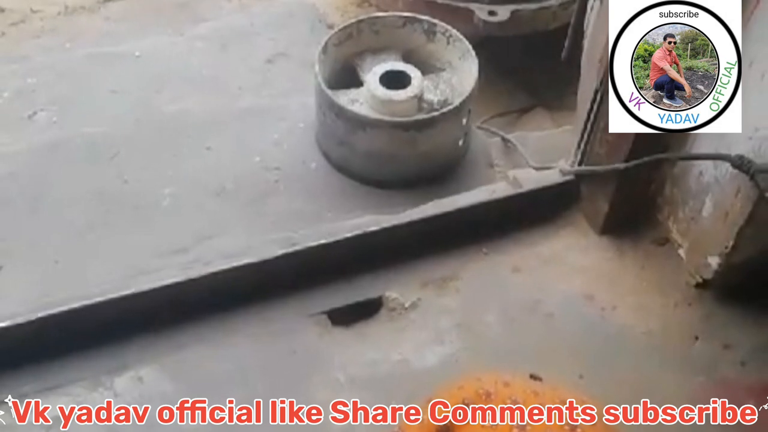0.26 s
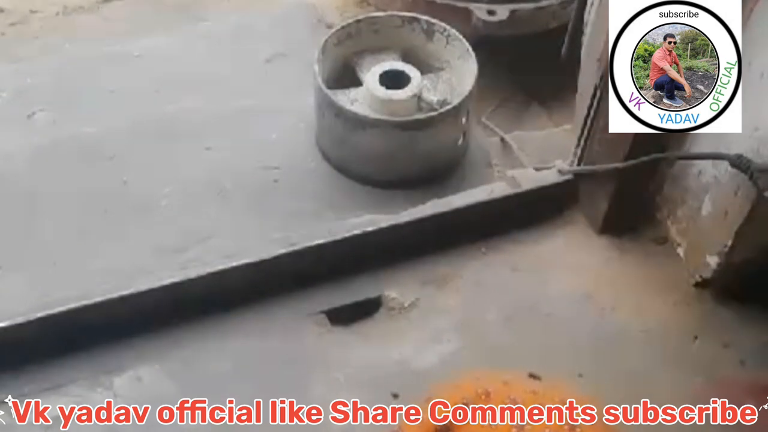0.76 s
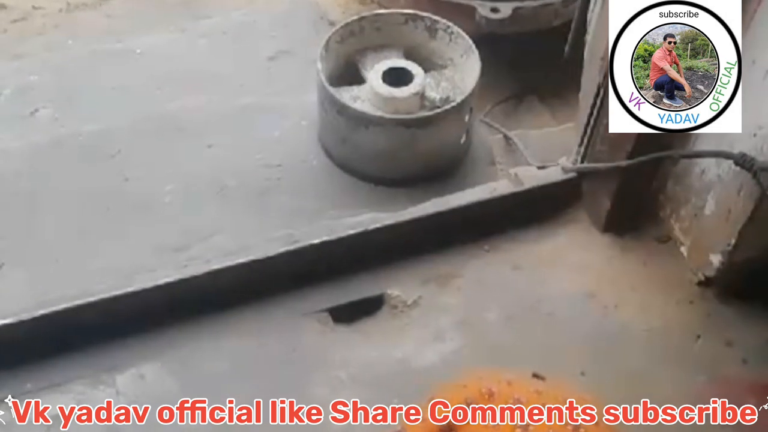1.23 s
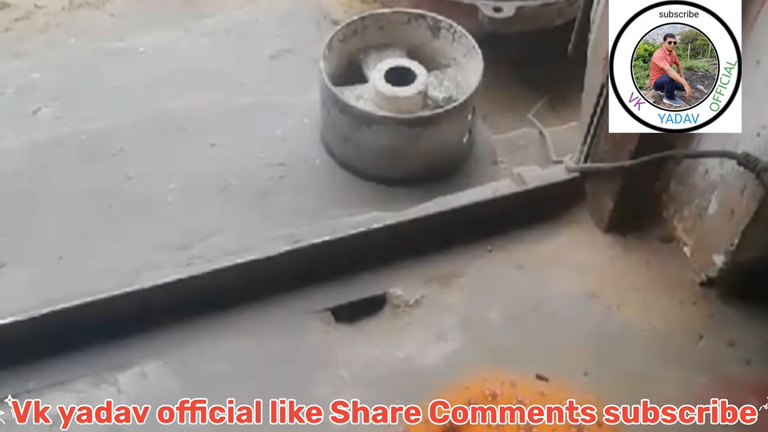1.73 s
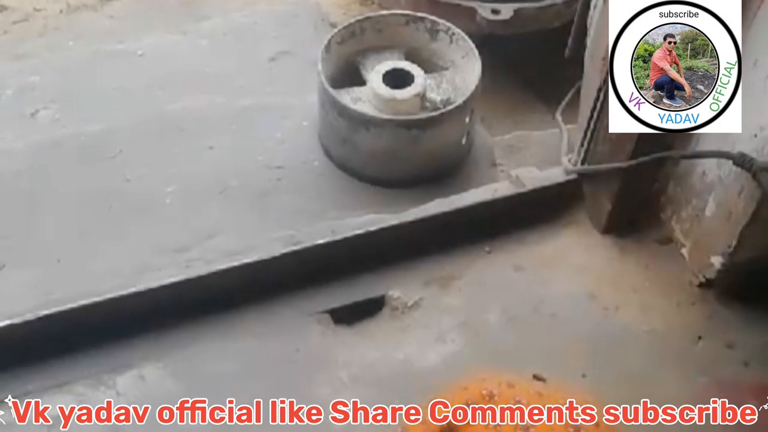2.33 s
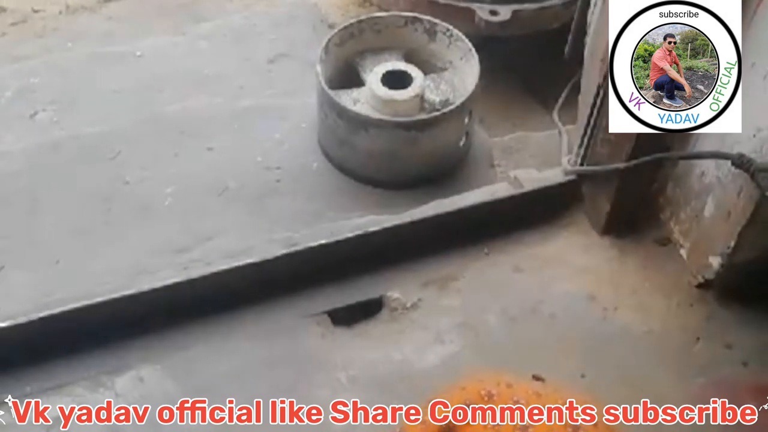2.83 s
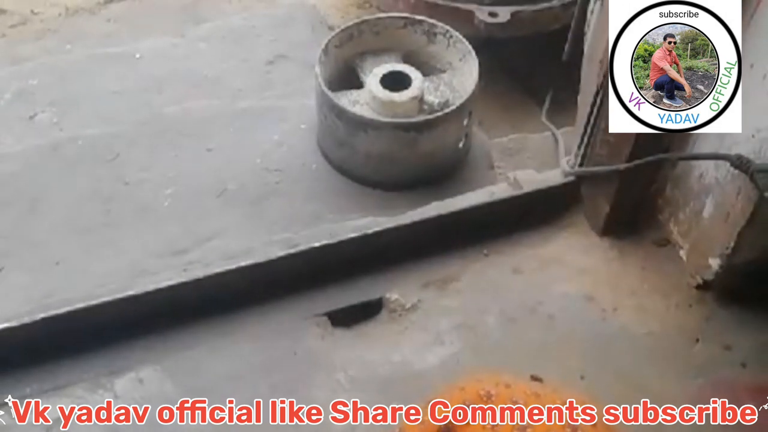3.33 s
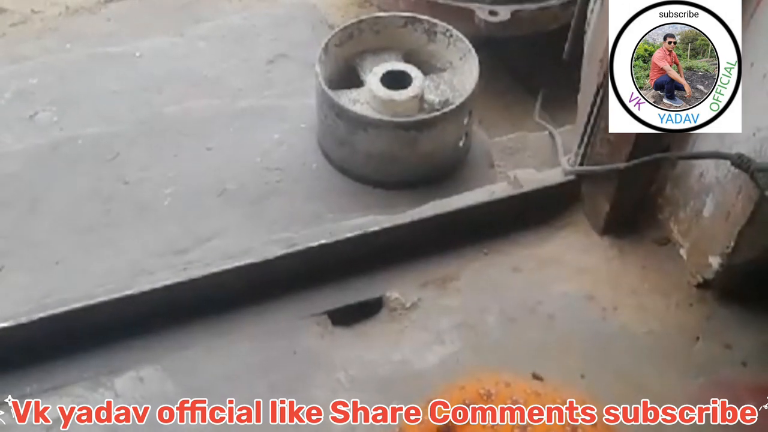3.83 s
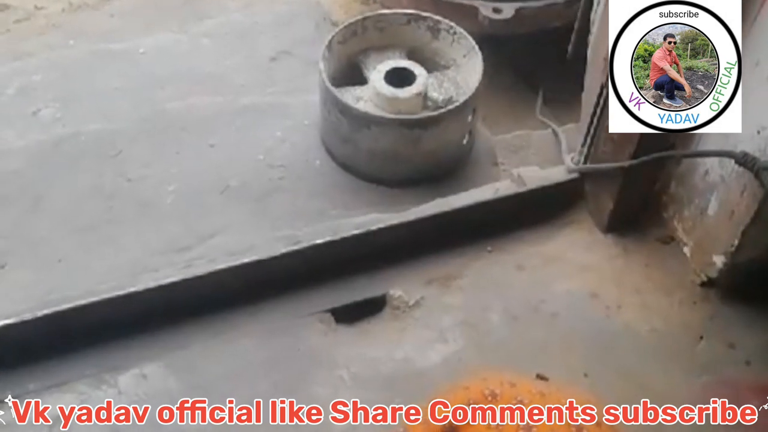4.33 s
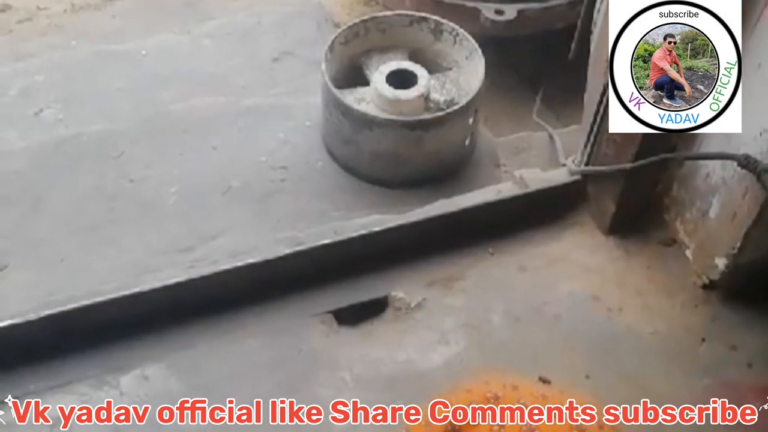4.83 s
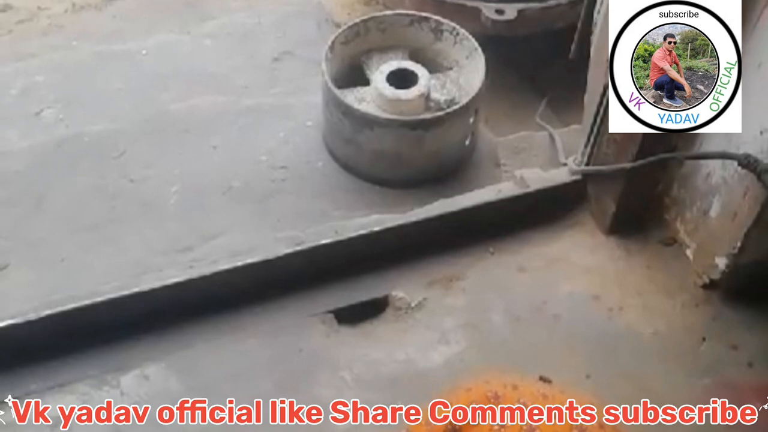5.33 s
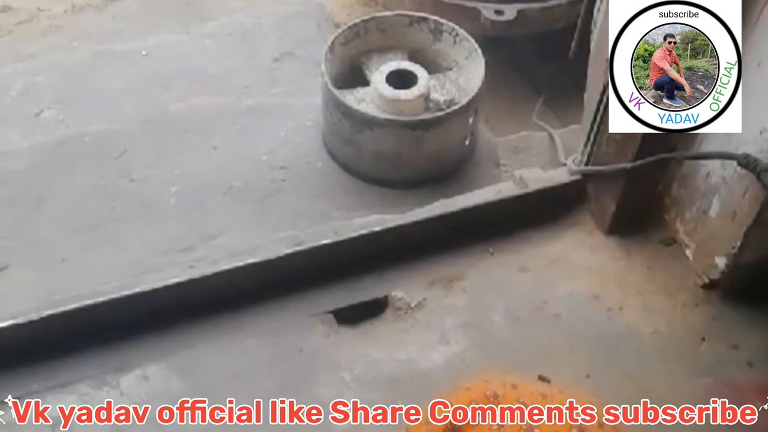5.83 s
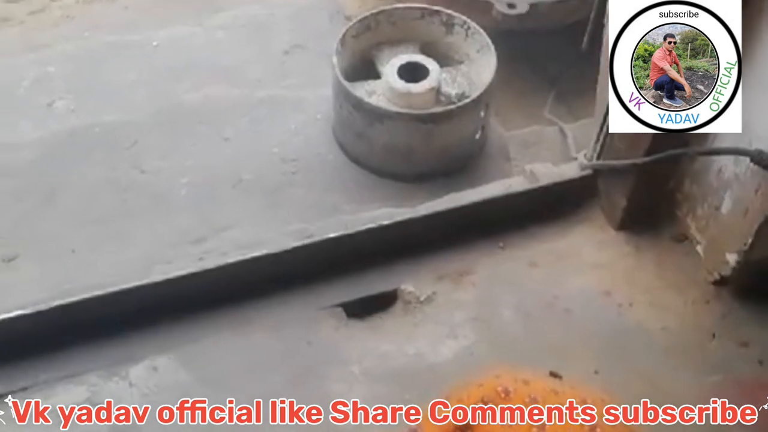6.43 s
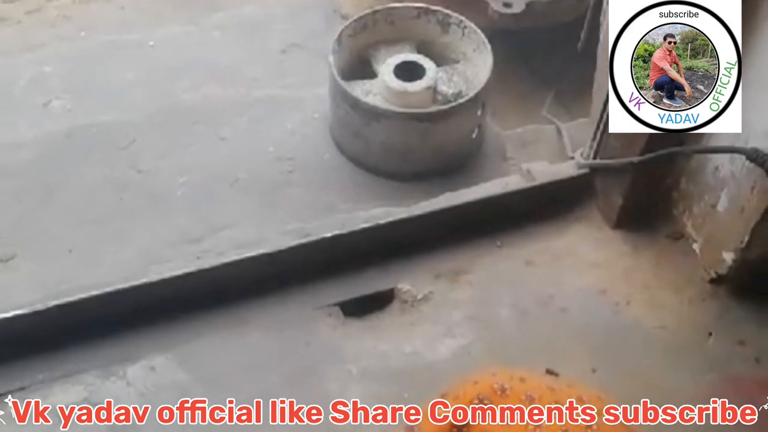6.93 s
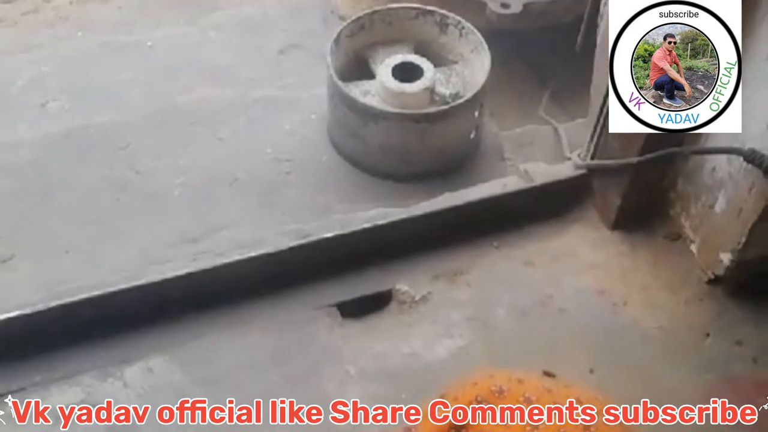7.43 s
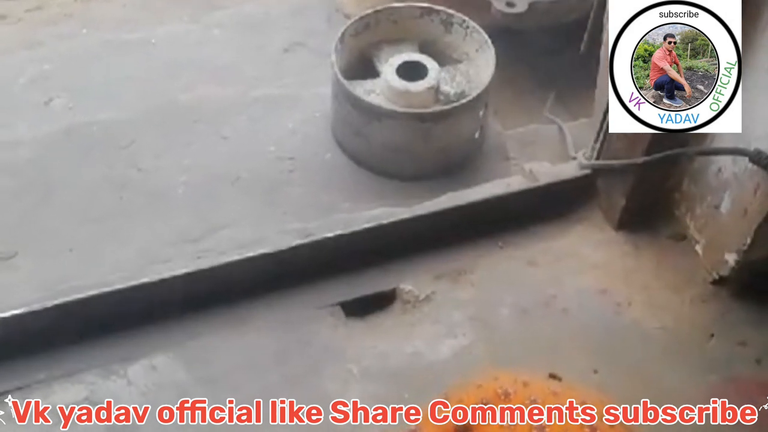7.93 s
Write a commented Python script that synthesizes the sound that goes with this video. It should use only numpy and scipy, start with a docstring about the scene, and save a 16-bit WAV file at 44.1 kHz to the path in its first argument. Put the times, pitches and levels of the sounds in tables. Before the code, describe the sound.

A stone mill spins up with rushing air and rising whine, then its grinding faces bite into a loud, harsh metallic screech that sags slightly.

```python
"""Stone flour mill: run-up and screech

A stone flour mill spins up in a small room: noise filtered by duct and housing is its rushing air,
and sines at multiples of the shaft speed are its rotor whine, which climbs in pitch.
The grinding faces then touch and rub four times a turn: noise modulated by the shaft angle rings the
steel housing into a screech while the load drags the shaft down. The contact eases once, briefly,
and the shaft picks up speed before it bites again."""
import sys
import numpy as np
from scipy import signal
from scipy.fft import rfft, irfft, next_fast_len
from scipy.io import wavfile
from scipy.ndimage import map_coordinates

SR = 44100
rng = np.random.default_rng(int(sys.argv[2]) if len(sys.argv) > 2 else 0)


def store_wav(level_fs):
    """Save 16-bit WAV to argv[1]."""
    pcm = np.round(np.clip(np.atleast_2d(level_fs), -1, 1) * 32767)
    wavfile.write(sys.argv[1], SR, pcm.T.astype(np.int16))


N = 360297


def amp(db):
    """Decibel definition: amplitude ratio of a level in dB."""
    return 10 ** (np.asarray(db) / 20)


def unit(x):
    """Normalization to an rms of 1."""
    return x / np.sqrt(np.mean(x ** 2) + 1e-20)


def along(points, hz):
    """Logarithmic frequency scale: each column of a table interpolated along it."""
    f, *columns = np.transpose(points)
    return np.array([np.interp(np.log(hz + 1), np.log(f + 1), c) for c in columns])


def curves(rows):
    """Linear interpolation in time: one value per sample for each column after t."""
    t, *columns = np.transpose(rows)
    return [np.interp(np.arange(N) / SR, t, c) for c in columns]


def wobble(rate):
    """Band-limited fluctuation: a smooth random curve with rate knots a second."""
    knots = rng.standard_normal(int(N * rate / SR) + 4)
    return map_coordinates(knots, [np.arange(N) * rate / SR])


def swell(t, length):
    """Gaussian envelope: a soft bump in time."""
    return np.exp(-((np.arange(N) / SR - t) / length) ** 2)


def swells(rows):
    """Superposition of soft bumps given as (t, height, length)."""
    return sum(height * swell(t, length) for t, height, length in rows)


def since(t):
    """Elapsed time: seconds since t, zero before it."""
    return np.maximum(np.arange(N) / SR - t, 0)


def step(t, rise):
    """Linear ramp: from 0 to 1, starting at t and taking rise seconds."""
    return np.clip(since(t) / rise, 0, 1)


def filtered(x, response):
    """Linear filtering: the spectrum of x times a complex response of frequency."""
    m = next_fast_len(N + SR // 2)
    return irfft(rfft(x, m) * response(np.fft.rfftfreq(m, 1 / SR)), m)[..., :N]


def ports(direct, diffuse, alike, lead):
    """Spatial coherence: direct sound reaches both ports with a phase lead; the room's share is unrelated."""
    def share(hz):
        return np.clip(along(alike, hz), 0, 1)

    def direct_response(hz):
        return np.sqrt(share(hz)) * np.exp(.5j * along(lead, hz) * [[1], [-1]])

    return filtered(direct, direct_response) + filtered(diffuse, lambda hz: np.sqrt(1 - share(hz)))


# likeness of airborne noise at the two microphone ports: f/Hz, likeness (0-1)
AIR_ALIKE = [(250, 0.96), (450, 0.8), (1400, 0.43), (1800, 0.56), (2500, 1), (4000, 0.71), (6500, 0.5),
             (9000, 0.073)]
# phase by which its left side leads: f/Hz, lead/rad
AIR_LEAD = [(250, 0.3), (550, 3.5), (900, 3.43), (1100, 1.37), (2100, 1.6), (2500, 3.12), (4300, 5.52),
            (4750, 5), (5350, 6.4), (5750, 9.4), (6300, 11.7), (7000, 4.7), (8000, 14.7)]


def turbulence():
    """Aerodynamic noise: random pressure, partly coherent between the ports."""
    return ports(rng.standard_normal(N), rng.standard_normal((2, N)), AIR_ALIKE, AIR_LEAD)


def rush(tone):
    """Spectral shaping: stereo turbulence of rms 1 with a given colour."""
    return unit(filtered(turbulence(), lambda hz: amp(along(tone, hz))))


# likeness of rubbing sound at the two ports: f/Hz, likeness (0-1)
RUB_ALIKE = [(2200, .65), (2800, .93), (5000, .92), (6200, .45), (9000, .15), (13500, .35)]
# phase by which its left side leads: f/Hz, lead/rad
RUB_LEAD = [(2200, 1.33), (2600, 2.9), (3550, 3), (3950, 4.54), (4200, 3.92), (5300, 6.7), (5900, 10),
            (6250, 10.8), (6500, 11.8), (7900, 13.3), (10000, 19), (12000, 16), (13100, 18.8), (14500, 26)]


def rub_field(direct, diffuse):
    """Direct and diffuse fields: rubbing noise with its own coherence and phase lead."""
    return ports(direct, diffuse, RUB_ALIKE, RUB_LEAD)


def rub_noise():
    """Broadband excitation: steady rubbing noise at both ports."""
    return rub_field(rng.standard_normal(N), rng.standard_normal((2, N)))


def ring(x, modes):
    """Modal resonance: x through steep-sided peaks, at each port's own strength, set to rms 1."""
    def gain(hz):
        power = 0
        for f, width, left, right in modes:
            peak = 1 / (1 + ((hz - f) / width * np.sqrt(2)) ** 2) ** 2
            power = power + amp([[left], [right]]) ** 2 * peak
        return np.sqrt(power)
    return unit(filtered(x, gain))


def band_gain(rows):
    """Gaussian bands in frequency: a response of summed dB bumps (f, width, dB)."""
    return lambda hz: amp(sum(db * np.exp(-((hz - f) / width) ** 2) for f, width, db in rows))


# antiresonances of the housing: f/Hz, width/Hz, gain/dB
NOTCHES = [(2743, 59, -14), (3380, 160, -4.5), (4520, 170, -6), (5053, 46, -9.5), (5270, 72, -4),
           (5780, 110, -3), (7480, 250, -6.5)]


def notched(x):
    """Antiresonance: narrow gaps where the housing radiates little."""
    return filtered(x, band_gain(NOTCHES))


# run-up: speeds in turns/s, time constant in s
START_RPS, FREE_RPS, RUNUP_S = 27.3, 50.3, .625
# under load: quick sag in turns/s, its time constant in s, then steady drag in turns/s per s
SAG_RPS, SAG_S, DRAG_RPS_PER_S = 4.75, .52, 1.05
# the faces first touch, rebound, then bite (s)
TOUCH_S, REBOUND_S, BITE_S = 2.773, 2.784, 2.803
# the contact eases and bites again (s); pickup in turns/s and its decay constant in s
EASE_S, REBITE_S, PICKUP_RPS, RELOAD_S = 6.49, 6.7, 2.2, .25


def loaded(rise=0.048):
    """Load transition: 0 while the mill runs free, 1 soon after the faces touch."""
    return step(TOUCH_S, rise)


def eased(release=0.027, attack=0.022):
    """Contact relief: 1 while the contact is eased, else 0."""
    return step(EASE_S, release) - step(REBITE_S, attack)


def speed():
    """Rotational inertia: turns/s near the free speed, sag under load and pick up while eased."""
    free = FREE_RPS - (FREE_RPS - START_RPS) * np.exp(-since(0) / RUNUP_S)
    sag = SAG_RPS * (1 - np.exp(-since(TOUCH_S) / SAG_S)) + DRAG_RPS_PER_S * since(TOUCH_S)
    pickup = PICKUP_RPS * step(EASE_S, REBITE_S - EASE_S) * np.exp(-since(REBITE_S) / RELOAD_S)
    return np.minimum(free, free[round(TOUCH_S * SR)]) - sag + pickup


# colour of the airflow: f/Hz, left level/dB, right level/dB (spectral density)
AIR_TONE = [(130, -26, -25), (220, -22, -22.5), (315, -17.5, -22), (460, -22, -11), (694, -9.5, -12),
            (890, -10.5, -13), (1310, -6, -2.5), (1774, -7.5, -6), (2385, -2.5, 6.5), (2610, 1.5, 6.5),
            (4230, -9.5, -4), (6130, -3, 3.5), (7900, -15, -23), (15900, -44, -28)]
# resonances of the air duct, fading out after the touch: f/Hz, width/Hz, rise/dB
DUCT = [(1685, 16, 7.5), (2683, 36, 6.5), (3220, 38, 5.5), (4070, 70, 5), (4730, 58, 11.5)]


def air(free_db=-20.5, lowered_db=-30, rise_db=6, drop_s=0.07):
    """Duct resonance and flow noise: the rushing air sounds quieter from the touch on, and louder again while
    the contact eases."""
    drop = 1 - np.exp(-since(TOUCH_S) / drop_s)
    flow = rush(AIR_TONE)
    ducted = filtered(flow, band_gain(DUCT))
    level_db = free_db + (lowered_db - free_db) * drop + rise_db * eased() + 0.74 * wobble(12)
    return amp(level_db) * (ducted + drop * (notched(flow) - ducted))


# air jet at the outlet, running free: t/s, level/dB, centre f/Hz, left minus right level/dB
JET = [(0, -22.5, 3300, -23), (.3, -25.5, 4120, -7), (.5, -21, 5130, -4), (.68, -21.5, 5430, -7),
       (.85, -20, 5330, -25), (1.05, -19.5, 5530, -28), (1.5, -22.5, 5150, -27), (2, -21.5, 5040, -12),
       (2.76, -23, 4850, -11)]
# the jet under load: level/dB, centre f/Hz, left minus right level/dB
JET_LOADED = (-25, 4620, -2.7)


def jet(width_hz=620):
    """Jet noise: a band of outlet turbulence drifts in pitch while free and settles under load."""
    level, centre, pan = [free + (held - free) * loaded() for free, held in zip(curves(JET), JET_LOADED)]
    spectrum = signal.stft(rush([(100, 0, 0), (16000, 0, 0)]), nperseg=512)[2]
    hz = np.fft.rfftfreq(512, 1 / SR)[:, None]
    at = np.minimum(np.arange(spectrum.shape[2]) * 256, N - 1)  # sample under each frame
    passband = np.exp(-((hz - centre[at]) / (2 * width_hz)) ** 2)
    band = unit(signal.istft(spectrum * passband, nperseg=512)[1][:, :N])
    sides = np.array([amp(pan / 2), amp(-pan / 2)])
    return amp(level) * sides / np.sqrt(np.mean(sides ** 2, axis=0)) * band


# colour of the dust hiss: f/Hz, left level/dB, right level/dB (spectral density)
DUST_TONE = [(6130, -42, -46), (8670, -3, -4), (9550, -0.5, -11), (10100, 3, 0), (11800, 1, -25),
             (13800, -8.5, -20), (15100, -1, -18), (15600, -5, -32)]
# puffs of dust: t/s, rise/dB, length/s
PUFFS = [(0, 4, 0.39), (.39, 6.5, 0.04), (0.56, 6, 0.073), (.69, 4.5, .03), (2.0, 3, 0.51),
         (2.727, 5.5, 0.26)]


def dust(free_db=-37, loaded_db=-32.0):
    """Particle-flow noise: fine dust hisses and is thrown out in a few puffs."""
    level_db = free_db + (loaded_db - free_db) * loaded() + swells(PUFFS) + 0.95 * wobble(65)
    return amp(level_db) * rush(DUST_TONE)


# housing modes: f/Hz, width/Hz, left level/dB, right level/dB
STEEL = [(2330, 275, -17, -17.5), (2855, 59, -4, -6.5), (2962, 47, -0.5, -2.5), (3210, 40, -3.5, -2.5),
         (3280, 260, 0, -2.5), (3727, 220, 0.5, 0), (3806, 39, -5, -1), (4026, 140, 2.5, -9.5),
         (4003, 64, -5.5, -12), (4330, 165, -4.5, -1.5), (4930, 164, -4.5, 5), (4955, 18, -2, -7),
         (5210, 140, -5, -0.5), (5230, 130, -20, -18.5), (6264, 94, -7.5, -7), (6490, 125, -6, -10)]


def brush(turns, spread_hz=520, beat_db=5.5, start_db=-27.0, hold_s=0.23, clear_s=.22, light_db=-37):
    """Source-filter principle: a once-a-turn scrape climbs with the shaft through fixed housing modes.

    It lightens as the faces clear."""
    grit = filtered(rng.standard_normal((3, N)), lambda hz: np.exp(-(hz / spread_hz) ** 2))
    # the carrier moves the grit's band to the 124th multiple of the shaft
    scrape = grit * np.cos(2 * np.pi * 124 * turns) * amp(beat_db * np.cos(2 * np.pi * turns))
    level = amp(light_db + (start_db - light_db) * np.exp(-since(hold_s) / clear_s)) * (1 - loaded())
    return level * notched(ring(rub_field(scrape[0], scrape[1:]), STEEL))


# narrow modes of the stone mount under the early scrape: f/Hz, width/Hz, left level/dB, right level/dB
WHISTLE = [(2730, 70, -3, -4), (3200, 40, -6, -7), (3465, 35, -5, -6), (3775, 36, -1, 2), (3965, 20, 2, 1),
           (4045, 24, 4, 4)]
# modes that take over as the speed rises: f/Hz, width/Hz, left level/dB, right level/dB
WHISTLE_HIGH = [(4715, 45, -3, 5), (4900, 70, -6, 1), (4950, 60, -7, 1)]
# when those sing: t/s, level/dB, length/s
WHISTLE_SWELL = (0.55, -26, 0.17)


def whistle(turns, level_db=-22, end_s=0.29, fade_s=.1, beat_db=4.5):
    """Forced modal vibration: the scrape rings low modes at steady pitch, then higher ones take over."""
    force = rub_noise()
    t, db, length = WHISTLE_SWELL
    level = amp(level_db + beat_db * np.cos(2 * np.pi * turns)) * (1 - step(end_s, fade_s))
    return level * ring(force, WHISTLE) + amp(db) * swell(t, length) * ring(force, WHISTLE_HIGH)


# colour of the frame's rumble: f/Hz, left level/dB, right level/dB (spectral density)
FRAME_TONE = [(15, -10, -13), (50, 2, 2), (69, 1, 2), (120, -3, -5), (167, 0, 1.5), (220, -4, -5),
              (600, -3.5, -2.5), (1190, 4, 0), (2010, -44, -37)]
# dull knocks of the frame: t/s, level/dB, length/s
KNOCKS = [(3.245, -41, .025), (6.0, -54, 0.02), (6.112, -51, 0.023), (6.27, -44, 0.02), (7.103, -46, 0.025),
          (7.19, -47, .025), (7.555, -42, 0.021)]
# swells of the sixth shaft multiple, a panel booming: t/s, level/dB, length/s
BOOMS = [(1.104, -41.5, 0.032), (1.66, -47, 0.06)]
# deep hum that passes as the shaft slows: t/s, level/dB, length/s
HUM = (4.13, -49.5, 0.34)


def bursts(rows):
    """Superposed bursts: summed envelopes given as (t, level/dB, length)."""
    return sum(amp(db) * swell(t, length) for t, db, length in rows)


def frame(turns, free_db=-56, loaded_db=-44.5, settle_db_per_s=1.0,
          panel_db=-57.5, boom_hz=288, boom_width_hz=22):
    """Structure-borne sound: rumble jumps with load and settles, amid knocks, panel booms and a hum."""
    hum = bursts([HUM]) * unit(np.sin(2 * np.pi * 1.56 * turns + .4 * wobble(8)))
    panel = unit(filtered(rng.standard_normal(N), lambda hz: 1 / (1 + ((hz - boom_hz) / boom_width_hz) ** 2)))
    sixth = unit(np.sin(2 * np.pi * 6 * turns + .4 * wobble(30)))
    booms = panel * amp(panel_db) * (1 - loaded()) + sixth * bursts(BOOMS)
    thud = unit(filtered(rng.standard_normal(N), lambda hz: 1 / (1 + (hz / 170) ** 4)))
    knocks = thud * bursts(KNOCKS)
    shake_db = (1 - loaded()) * free_db + loaded() * (loaded_db - settle_db_per_s * since(TOUCH_S))
    shake = rush(FRAME_TONE)
    deep = filtered(shake, lambda hz: hz < 250)
    rumble = amp(1.7 * wobble(23)) * deep + amp(2.5 + 0.44 * wobble(20)) * (shake - deep)
    return amp(shake_db) * rumble + hum + booms + knocks


# rotor tones running free: multiple of the shaft, level/dB, change/(dB/s)
FREE_ORDERS = [(14, -3, -7.5), (28, 0, 0), (42, -9, 0), (56, -7, 0)]
# their common level: t/s, level/dB
FREE = [(0, -62), (.25, -43), (.9, -43.5), (1.13, -42), (1.24, -36), (1.42, -37), (1.52, -33), (1.7, -34),
        (1.85, -42), (2.1, -41), (2.48, -43), (2.7, -55)]
# rotor tones under load: t/s, 24th multiple level/dB, 28th multiple level/dB
LOADED = [(2.8, -63, -73), (3.13, -44, -60), (3.75, -48, -55), (4.05, -41.5, -52), (4.5, -46, -53),
          (4.95, -58, -58), (5.2, -48, -53), (5.62, -44, -58), (5.88, -50, -49), (6.3, -59, -49.5),
          (6.6, -58, -50), (6.74, -46.5, -57), (6.98, -51, -57), (7.12, -63, -51), (7.3, -64, -50),
          (7.5, -70, -47), (7.85, -70, -44.5), (8.17, -70, -50)]
# further tones under load: multiple of the shaft, level/dB against the 24th
LOAD_ORDERS = [(4, -10.5), (36, -10.5), (48, -8)]
# the 16th multiple, dying away under load: level/dB against the 24th, change/(dB/s)
LOW_ORDER = (-6.5, -2.8)
# fluctuation of each tone, and of all tones together as the load breaks them up (dB)
TONE_FADE_DB, BREAKUP_DB = 1.1, 3.2


def whine(turns, flutter_db=2.0, smear=0.7):
    """Blade-passing tones: ribs and vanes chop the air at multiples of shaft speed, in fluttering flow."""
    def line(k):
        level = amp(flutter_db * wobble(35) + TONE_FADE_DB * wobble(11))
        # phase jitter in radians, widest at the start of the run-up
        spread = smear * (1 + .5 * np.exp(-since(0) / RUNUP_S))
        jitter = spread * wobble(35) + .3 * wobble(120)
        return unit(level * np.sin(2 * np.pi * k * turns + jitter))

    ribs_db, vanes_db = curves(LOADED)
    free = amp(curves(FREE)[0]) * sum(amp(db + rise * since(0)) * line(k) for k, db, rise in FREE_ORDERS)
    sixteenth = amp(LOW_ORDER[0] + LOW_ORDER[1] * since(TOUCH_S)) * line(16)
    ribs = amp(ribs_db) * (line(24) + sixteenth + sum(amp(db) * line(k) for k, db in LOAD_ORDERS))
    vanes = amp(vanes_db) * line(28)
    tones = (1 - loaded()) * free + loaded() * (ribs + vanes) * unit(amp(BREAKUP_DB * wobble(22)))
    # f/Hz, left lead/rad
    lead = [(200, 2.7), (500, 0.75), (850, 1.4), (1050, 0.25), (1400, 0.31), (2500, 0.63)]
    return amp([[-1.5], [1]]) * filtered(tones, lambda hz: np.exp(.5j * along(lead, hz) * [[1], [-1]]))


# highest hiss: f/Hz, width/Hz, left level/dB, right level/dB
FIZZ = [(13200, 340, 0, -14), (14620, 640, 0, -18)]
# its course: t/s, level/dB
FIZZ_LEVEL = [(0, -40), (.3, -43), (.55, -32), (.8, -44), (1.5, -40), (1.8, -36), (2.0, -33), (2.3, -41.5),
              (2.75, -38), (2.9, -22), (3.2, -38), (5.2, -29), (6.2, -21.5), (6.55, -30), (6.75, -21),
              (7.1, -19), (7.7, -22.5), (8.0, -37)]


def fizz():
    """Band-limited noise: a thin hiss at the top of the range swells and fades."""
    return amp(curves(FIZZ_LEVEL)[0] + 2.1 * wobble(80)) * ring(rub_noise(), FIZZ)


# stray grains striking the housing: t/s, level/dB
TICKS = [(.062, -18), (.245, -19), (.604, -17), (.641, -12), (.74, -13), (1.841, -14), (2.264, -20)]


def ticks(length=0.0012):
    """Impulsive excitation: single grains snap against the metal as very short noise bursts."""
    # f/Hz, left level/dB, right level/dB
    snap = rush([(1000, -17, -20), (4500, 11, 5), (7000, -9, -14), (15000, -1, -16)])
    return snap * bursts([(t, db, length) for t, db in TICKS])


# band in which the airflow howls: f/Hz, width/Hz, left level/dB, right level/dB
HOWL = [(2390, 330, -2.5, 4)]
# its surges: t/s, level/dB, length/s
SURGES = [(1.55, -23, 0.25), (2.053, -22.5, 0.12), (2.597, -24.5, .14), (6.634, -26, .045)]


def howl():
    """Flow-excited resonance: the airflow surges in a low resonance of the housing."""
    return bursts(SURGES) * ring(turbulence(), HOWL)


# gain of the first touch and of the rebound (dB), rise of the touch (s), change while eased (dB)
TOUCH_DB, REBOUND_DB, TOUCH_ATTACK_S, EASE_DB = 6.5, -11, .001, -4
# the moment when the faces almost part: t/s, length/s, change/dB
PARTING = (6.55, 0.032, -6)


def contact(release=0.0013, bite=0.0099):
    """Contact mechanics: gain of a hard first touch, a rebound, then lasting contact that eases once."""
    touch = amp(TOUCH_DB) * (step(TOUCH_S, TOUCH_ATTACK_S) - step(REBOUND_S, release))
    rebound = amp(REBOUND_DB) * (step(REBOUND_S, release) - step(BITE_S, bite))
    t, length, db = PARTING
    return touch + rebound + step(BITE_S, bite) * amp(EASE_DB * eased() + db * swell(t, length))


def surface(rubs, size=96, count=5):
    """Periodic roughness: the same patch passes at every rub and wears into a new shape."""
    def patch():
        return map_coordinates(rng.standard_normal(size), [rubs % 1 * size], mode="grid-wrap")

    wear = np.array([wobble(8) for _ in range(count)])
    return unit(sum(w * patch() for w in wear / np.linalg.norm(wear, axis=0)))


def wander(x, flat=0, share=.0015, rate=14):
    """Frequency modulation: the ringing's pitch strays as the contact shifts, and may go flat."""
    stray = share * filtered(wobble(rate), lambda hz: hz > 1)
    at = np.arange(N) + np.cumsum(stray - flat)  # warped reading position
    return np.array([map_coordinates(side, [at]) for side in x])


def patches(x, gain_db):
    """Time-frequency weighting: gain_db(Hz, t, field) may draw on smooth random fields."""
    hz, t, z = signal.stft(x, SR, nperseg=1024)

    def field(size, count):
        kernel = np.outer(np.hanning(size + 3), np.hanning(count + 3))
        return unit(signal.fftconvolve(rng.standard_normal(z.shape[1:]), kernel, "same"))

    return signal.istft(z * amp(gain_db(hz, t, field)), nperseg=1024)[1][:, :N]


def shifting(x, depth_db=1.1):
    """Modal participation: neighbouring modes take turns to stand out as the contact point shifts."""
    return patches(x, lambda hz, t, field: depth_db * field(size=3, count=3))


# high modes of the rubbing faces: f/Hz, width/Hz, left level/dB, right level/dB
FACES = [(7917, 76, -4.5, -12), (8630, 470, -7.5, -19.5), (10116, 380, 0, -32), (10960, 1900, -8, -25.5),
         (12300, 500, -12, -29), (12600, 400, -9, -18), (13340, 250, -0.5, -14), (14540, 280, -0.5, -18),
         (16500, 2200, -4.5, -40)]
# contact pressure up to the easing, and after it; only departures from the mean act: t/s, level/dB
PRESSURE = [(2.83, -24.5), (3.1, -22.5), (3.31, -27.5), (3.38, -21.5), (4.28, -22.5), (4.34, -23),
            (4.68, -23.5), (4.71, -23.5), (5.17, -23), (5.24, -21), (6.13, -21.5), (6.2, -26),
            (6.45, -23.5)]
PRESSURE_AFTER = [(6.76, -23.5), (7.468, -23.5), (7.486, -20.5), (7.63, -25.5), (8.15, -23)]
# spell of uneven rubbing around each turn: t/s, depth/dB, length/s
THROB = (3.32, 2.5, 0.13)
# brief harder bites, lifting the upper modes: t/s, rise/dB, length/s
BITES = [(3.095, 3, .03), (3.53, 1.5, .035), (4.04, 4, .022), (4.262, 4, 0.021), (4.6, 2, 0.091),
         (5.33, 1, 0.07), (5.72, 3, .025), (7.84, 0.5, .04)]
# spells in which the lower modes fall back: t/s, change/dB, length/s
LULLS = [(3.45, -5, 0.026), (4.31, -1.5, .025), (6.29, -1, 0.021), (6.69, -1, 0.017)]
# the upper ringing goes a little flat: t/s, share of its pitch, length/s
FLATTEN = (4.7, .009, .5)
# the faces' sizzle is weak at first (dB), then builds (s)
SIZZLE_START_DB, SIZZLE_BUILD_S = -6, .05
# amplitude of the repeating friction against the fresh grit's 1; low limit of radiation (Hz)
REPEAT_SHARE, RUB_LOW_HZ = .42, 1300


def screech(turns, rub_db=0.5, throb_db=0.05, flutter_db=0.41, grit_db=0.72,
            lower_db=-14.5, upper_db=-18.5, sizzle_db=-20, lower_follows=0.21, sizzle_follows=0.16,
            dull_db_per_s=0.02, sharpen_db_per_s=0.1):
    """Friction-excited resonance: four rubs a turn, part repeating and part grit, ring housing and faces."""
    rubs = 4 * turns
    t, depth_db, length = THROB
    throb_depth = throb_db * wobble(3.04) + depth_db * swell(t, length)
    throb = throb_depth * np.cos(2 * np.pi * turns + .5 * wobble(16))
    rub = rub_db * np.cos(2 * np.pi * rubs + .5 * wobble(52))
    pressure = unit(amp(rub + throb + flutter_db * wobble(35) + grit_db * wobble(170)))

    def friction():
        return pressure * (REPEAT_SHARE * surface(rubs) + rng.standard_normal(N))

    force = rub_field(friction(), np.array([friction(), friction()]))
    # the upper modes follow the pressure most; with time the energy moves from the housing to the faces
    rows = np.vstack([PRESSURE, PRESSURE_AFTER])
    press_db = curves(rows)[0] - np.mean(rows[:, 1])
    low = lower_db + lower_follows * press_db - dull_db_per_s * since(BITE_S)
    sizzle = sizzle_db + sizzle_follows * press_db + sharpen_db_per_s * since(BITE_S)
    sizzle = sizzle + SIZZLE_START_DB * (1 - step(REBOUND_S, SIZZLE_BUILD_S))
    lower = amp(low + swells(LULLS)) * ring(force, [m for m in STEEL if m[0] < 4500])
    upper = amp(upper_db + press_db + swells(BITES)) * ring(force, [m for m in STEEL if m[0] >= 4500])
    faces = amp(sizzle + 0.86 * wobble(70)) * ring(force, FACES)
    ringing = notched(shifting(wander(lower) + wander(upper, swells([FLATTEN]))) + faces)
    # the rubbing parts radiate weakly at low frequency
    return contact() * filtered(ringing, lambda hz: 1 - np.exp(-(hz / RUB_LOW_HZ) ** 4))


def patchy(x, depth_db, top_hz=950, gap_db=13, free_share=.55, lift_db=.6):
    """Time-frequency weighting: the low register is randomly uneven, with gaps set deeper after the touch."""
    def gain_db(hz, t, field):
        weight = along([(200, 0), (450, 1), (top_hz, 1), (1.17 * top_hz, 0)], hz)[0][:, None]
        dips = np.minimum(field(size=6, count=7) + .4, 0)
        gaps = gap_db * dips * np.where(t > TOUCH_S, 1, free_share)
        return weight * (lift_db + depth_db * field(size=4, count=7) + gaps)
    return patches(x, gain_db)


def scene():
    """Superposition: one shaft angle drives the tones, the shaking and the rubbing."""
    turns = np.cumsum(speed()) / SR
    rubbing = brush(turns) + whistle(turns) + screech(turns)
    body = air() + frame(turns) + howl() + jet() + dust() + rubbing
    return patchy(body, depth_db=3.0) + fizz() + whine(turns) + ticks()


TOP_HZ = 15800  # band limit


def record(dry):
    """Clipping and band limitation: peaks stop at full scale, then a sharp low-pass acts."""
    return filtered(np.clip(dry, -1, 1), lambda hz: hz < TOP_HZ)


dry = scene()
out = record(dry)
store_wav(out)
```